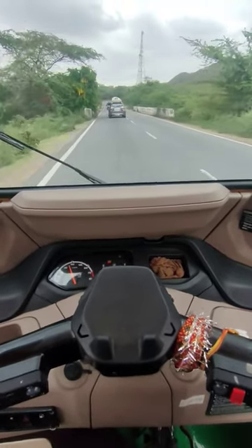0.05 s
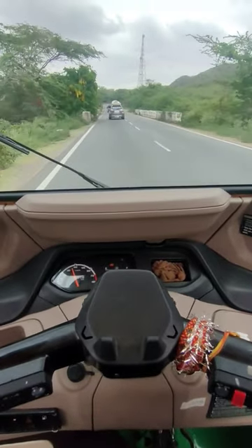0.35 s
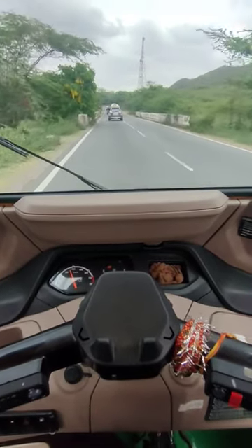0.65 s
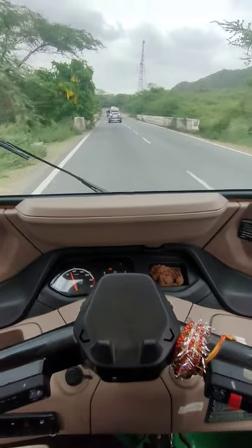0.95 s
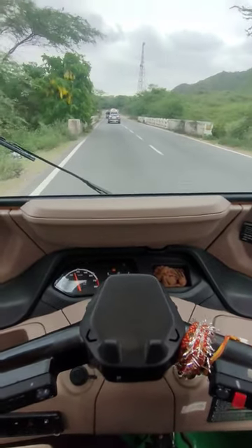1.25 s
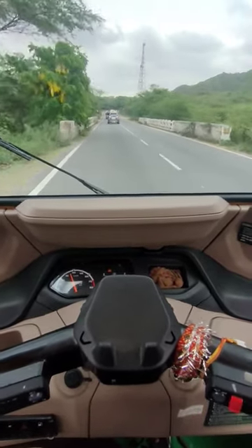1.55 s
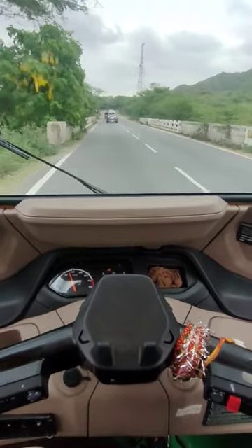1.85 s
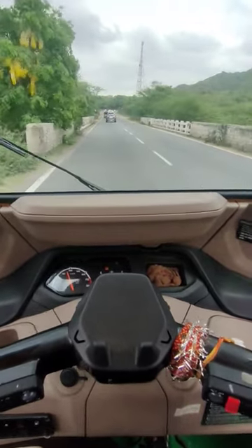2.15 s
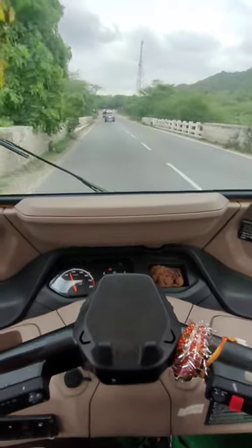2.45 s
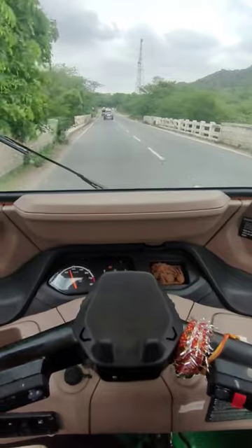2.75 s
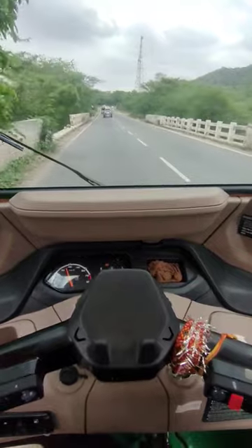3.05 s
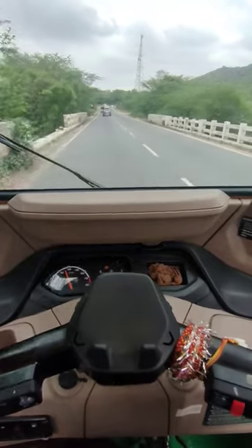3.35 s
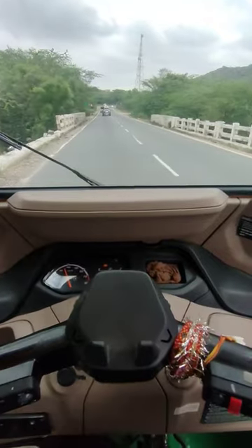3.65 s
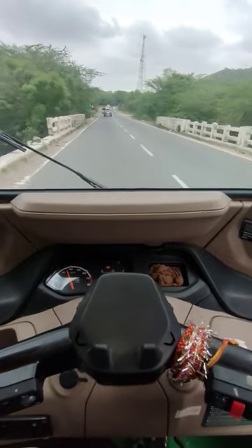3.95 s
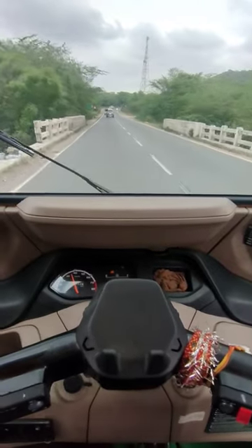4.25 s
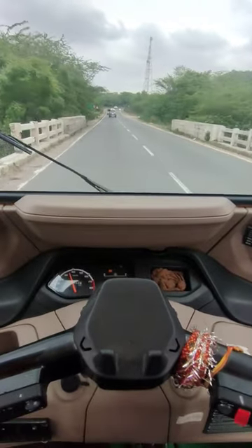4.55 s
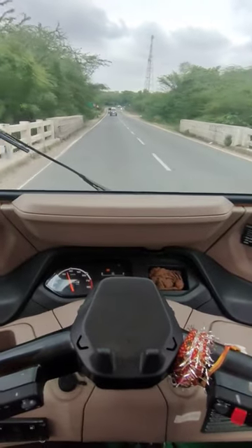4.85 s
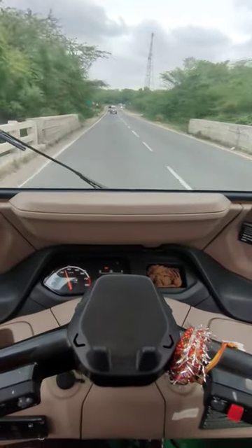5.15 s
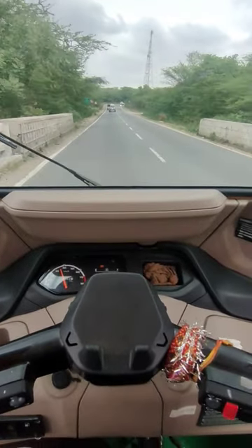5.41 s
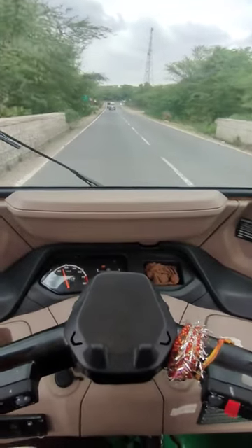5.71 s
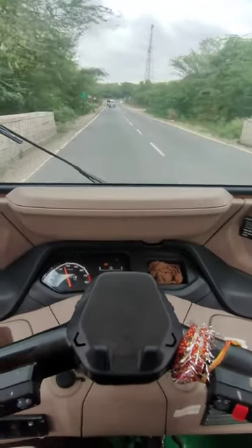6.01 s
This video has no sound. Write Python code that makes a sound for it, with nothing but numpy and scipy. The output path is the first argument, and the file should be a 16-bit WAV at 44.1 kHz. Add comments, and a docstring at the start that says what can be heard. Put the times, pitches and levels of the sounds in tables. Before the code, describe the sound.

An auto rickshaw cruises along a road, heard from the driver's seat in the open cab. Its small single-cylinder engine holds a low, throbbing hum with fast mechanical clatter, over tyre rumble and buffeting air. Hissing gusts and soft bumps come mostly in the first half. A loose metal fitting clinks about midway, and the engine then turns slightly harsher and buzzier at the same pitch.

```python
"""Open cab of an auto rickshaw, driver's seat, cruising on a country road. The single cylinder throbs once a
crank turn, sets the casing clattering and a panel buzzing; drive line and gears hum beside it. Tyres rumble,
bumps thud through the body, a low buffeting rumbles, air hisses round the windscreen, and a loose fitting
rattles now and then."""
import sys
import numpy as np
from scipy import signal
from scipy.fft import rfft, irfft, next_fast_len
from scipy.io import wavfile
from scipy.ndimage import uniform_filter1d, minimum_filter1d

SR = 44100
rng = np.random.default_rng(int(sys.argv[2]) if len(sys.argv) > 2 else 0)


def persist_wave(psi):
    """Save psi, clipped to +-1, as 16-bit WAV."""
    counts = np.round(np.clip(psi, -1, 1) * 32767).astype(np.int16)
    wavfile.write(sys.argv[1], SR, np.atleast_2d(counts).T)


N = 272361
TIME = np.arange(N) / SR
OPPOSED = np.array([[1], [-1]])  # left plus, right minus

# Crank speed. Each row: time in seconds, turn rate in Hz.
CRANK_SPEED = [(0, 51.11), (.9, 51.17), (1.4, 51.63), (2.3, 51.18), (3.6, 51.43), (4.02, 51.35),
               (4.5, 51.23), (4.7, 50.89), (5.6, 50.91), (6.18, 51.29)]
# Pull on the engine. Each row: time in seconds, load in dB.
ENGINE_LOAD = [(0, -3), (1, -2), (2.2, -2.5), (2.75, 0), (3.4, 1.5), (3.75, 1), (4.25, 0.5), (4.6, 1.5),
               (5.3, 1.5), (5.8, 0.5), (6.18, 1)]
# Cylinder hum. Each row: crank multiple, relative level in dB, left minus right in dB.
CYLINDER_ORDERS = [(1, 0, 1.1), (2, -1.1, 0.7), (3, -7, 5), (4, -11.5, 1), (5, -17.5, 5), (6, -19.5, -4.5),
                   (7, -25.5, -2), (8, -21, -3.5), (9, -24, -7.5), (10, -27, -5), (11, -21.5, 1),
                   (13, -28, -6), (14, -27.5, -9), (15, -32, 6), (17, -26, 2), (18, -34, -5), (20, -24, -7),
                   (21, -33, -4)]
# Brief level dips. Each row: centre in seconds, length in seconds, clatter dip in dB, hum dip in dB.
LEVEL_DIPS = [(0.325, 0.13, 2.5, 6), (0.853, 0.067, 1, 2.5), (1.146, 0.069, 3, 1), (1.68, 0.22, 0.5, 2.5),
              (2.078, 0.12, 0, 5), (3.17, 0.11, 3.5, 1), (4.048, 0.094, 2.5, 3), (4.381, 0.21, 4.5, 3),
              (5.906, 0.11, 5.5, 0)]
# Buzzing panel. Each row: frequency in Hz, bandwidth in Hz, level in dB at 0 dB load.
PANEL_MODES = [(1850, 100, -43.5), (2000, 38, -47.5), (2210, 130, -47.5)]
# Drive line and gear tooth tones. Each row: crank multiple, relative level in dB.
DRIVE_TONES = [(0.549, -28.5), (1.73, -32), (2.54, -34), (3.43, -38.5), (4.567, -32.5)]
GEAR_TONES = [(16.12, -31.5), (32.24, -39), (33.8, -38), (35.9, -35), (44.1, -41.5), (48.4, -40)]
# Road roughness. Each row: time in seconds, tyre rumble in dB.
ROAD_ROUGHNESS = [(0, -22.5), (.5, -18), (1.2, -20.5), (2.4, -19), (3.3, -21.5), (5, -21), (6.18, -21)]
# Thuds, knocks and rattles. Each row: start in seconds, level in dB, decay time in seconds.
BODY_THUDS = [(.235, -20.5, 0.046), (.445, -19, 0.045), (.73, -19.5, 0.08), (2.155, -18, 0.049),
              (2.42, -21, 0.093), (4.17, -23, 0.067), (5.83, -18.5, 0.047), (6.10, -22, 0.088)]
PANEL_KNOCKS = [(.034, -14, 0.0033), (.521, -27, 0.0087), (.895, -32, .03), (1.508, -27, 0.021),
                (1.715, -18, 0.01), (2.479, -23, 0.022), (4.023, -15, 0.004), (4.209, -22, 0.013)]
FITTING_SHAKES = [(1.095, -33, 0.0093), (3.075, -27, 0.007), (3.082, -31, .005)]
# The fitting strikes the frame. Each row: start in seconds, level in dB.
FITTING_STRIKES = [(3.078, -21), (3.086, -34)]
# Its ring. Each row: frequency in Hz, relative level in dB, T60 in seconds.
FITTING_MODES = [(2050, 3, 0.07), (2100, -5, .06), (3420, -8, .05), (4400, -21, .07), (5076, -21, .06),
                 (6331, -20, .07)]
# Windscreen gusts. Each row: crest in seconds, hiss in dB, clatter in dB, rise and fall in seconds.
WIND_GUSTS = [(.15, -42, -28, 0.05, .07), (.68, -30, -23.5, 0.058, 0.093), (.93, -30, -25, 0.045, 0.059),
              (1.1, -29, -28, 0.08, 0.012), (1.28, -31.5, -27, 0.13, 0.066),
              (1.53, -33.5, -27.5, 0.14, 0.066), (1.92, -34.5, -26.5, 0.091, 0.066),
              (2.46, -39.5, -28, 0.11, 0.049), (3.32, -37, -35, 0.068, 0.033),
              (4.35, -36, -27, 0.032, 0.023), (4.497, -34.5, -37, .009, 0.073)]
# Noise spectra. Each row: frequency in Hz, relative spectral density in dB.
CASING_SPECTRUM = [(300, -59), (600, 4), (850, 3), (1400, -1), (1620, -3), (1850, -4.5), (2100, -7),
                   (2400, -8.5), (2900, -16), (4200, -31.5), (8000, -34.5)]
TYRE_SPECTRUM = [(25, -1), (65, 1), (120, -2.5), (230, -4.5), (340, -9), (460, -11.5), (550, -14.5),
                 (900, -20), (1900, -27), (3200, -36), (4300, -45), (15000, -60)]
THUD_SPECTRUM = [(110, 6.5), (220, 1.5), (320, -6), (550, -6), (900, -17), (2000, -62), (6000, -48)]
KNOCK_SPECTRUM = [(250, 10), (500, 11.5), (950, -4.5), (1500, -3), (2500, -22), (5000, -55), (12000, -59)]
RATTLE_SPECTRUM = [(400, -6), (1200, 16), (1800, 2), (2100, 9), (2600, -4), (4500, 3.5), (8000, -0.5),
                   (15000, -9)]
HISS_SPECTRUM = [(1500, -2), (3000, 13.5), (4500, 4), (6000, 3.5), (7400, 5.5), (9000, -2), (13000, -3),
                 (15000, -12.5)]
GUST_SPECTRUM = [(520, 29), (900, 10), (1800, 15), (3000, 14.5), (4500, 8), (6000, 7.5), (7400, 8),
                 (9000, 3), (13000, 3), (15000, -3)]
BUFFET_SPECTRUM = [(8, 0), (28, 0), (65, -6), (120, -10), (250, -18), (1000, -45), (8000, -80)]


def engine(turns, load_db, gust_clatter, dip_db, hum_dip_db):
    """Hum and clatter follow the load; uneven combustion wavers the hum, gusts add clatter."""
    firing_db = 0.86 * walk(34) - hum_dip_db
    throb_db = -15.6 + 0.27 * load_db + firing_db
    boom_db = -16.44 + 0.4 * load_db + firing_db
    upper_db = -17 + load_db - 0.5 * dip_db
    knock_gain = undb(-27.5 + 2 * load_db - dip_db - 0.17 * walk(29))
    hum = cylinder_hum(turns, throb_db, boom_db, upper_db)
    return hum + np.hypot(knock_gain, gust_clatter) * casing_clatter(turns, load_db)


def cylinder_hum(turns, throb_db, boom_db, upper_db):
    """Low orders form a deep and a shallow pressure dip each turn; panel echoes scatter the rest."""
    out, roughness = 0, walk(42)
    for order, db, balance_db in CYLINDER_ORDERS:
        order = round(order)
        phase = 2 * np.pi * order * turns
        if order == 1:
            tone = -np.cos(phase + np.pi / 4) * undb(throb_db + db)
        elif order < 6:
            # cab standing waves put the odd orders ahead of the even ones
            skew_rad = 0.061 * order * OPPOSED + np.pi / 8 * order * (order % 2)
            tone = -np.cos(phase + skew_rad + 0.083 * walk(7.4)) * undb(boom_db + db + walk(41))
        else:
            scatter_rad = rng.uniform(0, 2 * np.pi) - 0.044 * order * OPPOSED
            wobble_rad = 0.18 * walk(6) + 0.0095 * order * roughness
            tone = np.cos(phase + scatter_rad + wobble_rad) * undb(upper_db + db + 1.6 * walk(8.1))
        out = out + np.sqrt(2) * tone * pan(balance_db)
    return out


def casing_clatter(turns, load_db, scatter_db=3.5, jitter_s=0.00013, decay_s=0.032):
    """Piston and valve knocks ring the casing's dense modes; a rush of gas follows each turn."""
    starts_s = np.interp(np.arange(1, int(turns[-1])), turns, TIME)
    timing, force = rng.standard_normal((len(starts_s), 2)).T
    hits = np.clip((starts_s + jitter_s * timing) * SR, 0, N - 1).astype(int)
    decay = np.exp(-TIME[:SR // 6] / decay_s)
    ring = 0
    for stride in (1, 2):  # piston every turn, valves every other
        knocks = np.zeros(N)
        knocks[hits[::stride]] = undb(scatter_db * force[::stride])
        contact = 1.14 * walk(5.1)  # the contact point wanders between two mode sets
        for share in (np.cos(contact), np.sin(contact)):
            response = white(len(decay)) * decay
            ring = ring + signal.fftconvolve([share * knocks], response, axes=1)[:, :N]
    ring = colour(ring, [(500, -25.5), (1300, -11.5)]) * undb(0.5 * load_db)
    gas = white() * (1 + 0.041 * np.sin(2 * np.pi * turns)) * undb(0.68 * walk(95))
    left, right = colour(unit(ring) + undb(0.5) * unit(gas), CASING_SPECTRUM)
    # a panel on the right passes more rasp
    right = colour(right, [(100, 0), (1200, 2), (2300, 4.5), (3500, 0)])
    return unit(np.array([left, right]) - 0.15 * np.array([right, left]))  # partly in antiphase


def panel_buzz(turns, load_db):
    """Each firing shakes a thin panel on the right, harder under load."""
    locked = sum(np.cos(2 * np.pi * order * turns + rng.uniform(0, 2 * np.pi, (2, 1)) + 0.64 * walk(3.3))
                 for order in range(30, 50))
    loose = unit(colour(white(), [(1500, 0), (2500, 0), (4000, -30)]))
    slap = 1 + 0.11 * np.cos(2 * np.pi * turns)
    shake = (unit(locked) + undb(-4) * loose) * undb(walk(27)) * slap
    modes = sum(undb(db) * unit(signal.lfilter(*signal.iirpeak(hz, hz / width_hz, SR), shake))
                for hz, width_hz, db in PANEL_MODES)
    return modes * undb(2 * load_db) * pan(-8)


def shaft_tones(turns, tones, waver_db, wobble_rad):
    """Shafts and gears turn at set ratios to the crank, wavering in phase and level."""
    out = 0
    for ratio, db in tones:
        phase = 2 * np.pi * ratio * turns + wobble_rad * walk(9.5)
        channel_rad = ratio / 20 * rng.standard_normal((2, 1))
        out = out + np.sqrt(2) * np.sin(phase + channel_rad) * undb(db + waver_db * walk(8.5))
    return out


def tyre_rumble(level_db, surge_db=1.5):
    """Tyre noise fills the cab, surging with the surface."""
    return undb(level_db + surge_db * walk(15)) * unit(colour(diffuse(700, 0.45), TYRE_SPECTRUM))


def road_bumps():
    """Jolts drum on the floor and now and then knock a panel."""
    thuds = bursts(BODY_THUDS, rise_s=0.00047) * unit(colour(diffuse(400, 0.94), THUD_SPECTRUM))
    knocks = bursts(PANEL_KNOCKS, rise_s=0.00053) * unit(colour(diffuse(1500, 0.61), KNOCK_SPECTRUM))
    return thuds + knocks


def loose_fitting(grain_db=2.5, contact_s=0.0015):
    """A metal fitting rattles in bursts of tiny contacts and rings when it strikes the frame."""
    contacts = white() * undb(-grain_db * walk(500))
    out = bursts(FITTING_SHAKES, rise_s=0.0019) * unit(colour(contacts, RATTLE_SPECTRUM))
    for start_s, strike_db in FITTING_STRIKES:
        age_s = np.maximum(TIME - start_s, 0)
        ring = sum(undb(db - 60 * age_s / t60_s) * np.sin(2 * np.pi * hz * age_s)
                   for hz, db, t60_s in FITTING_MODES)
        out = out + undb(strike_db) * (1 - np.exp(-age_s / contact_s)) * ring
    return out


def low_buffet(level_db=-24, swing_db=3):
    """A low buffeting rumbles, partly uncorrelated between left and right."""
    buffeting = unit(colour(diffuse(30, 0.95), BUFFET_SPECTRUM))
    return undb(level_db + swing_db * walk(1.7)) * buffeting


def windscreen_hiss(load_db, gust_hiss, dip_db, flutter_db=1.43):
    """Air hisses round the windscreen edge and tears at it in gusts."""
    steady = undb(-39.5 + 0.79 * load_db - 0.77 * dip_db) * unit(colour(white(), HISS_SPECTRUM))
    tearing = gust_hiss * unit(colour(white() * undb(walk(450)), GUST_SPECTRUM))
    return (steady + tearing) * undb(flutter_db * walk(30)) * pan(1.2)


def gust_gains():
    """Hiss and clatter gains as each gust crests and falls."""
    power = 0
    for crest_s, hiss_db, clatter_db, rise_s, fall_s in WIND_GUSTS:
        width_s = np.where(TIME < crest_s, rise_s, fall_s)
        shape = np.exp(-0.5 * ((TIME - crest_s) / width_s) ** 2)
        power = power + (undb([[hiss_db], [clatter_db]]) * shape) ** 2
    return np.sqrt(power)


def dip_depths_db(edge_s=0.0093):
    """Depth of the brief dips in clatter and in hum."""
    out = 0
    for centre_s, length_s, clatter_db, hum_db in LEVEL_DIPS:
        window = 0.5 + 0.5 * np.tanh((length_s - 2 * np.abs(TIME - centre_s)) / edge_s)
        out = out + np.array([[clatter_db], [hum_db]]) * window
    return out


def bursts(events, rise_s):
    """Envelope of fast rises and exponential decays."""
    out = 0
    for start_s, db, decay_s in events:
        age_s = np.maximum(TIME - start_s, 0)
        out = out + 2 * undb(db) * (1 - np.exp(-age_s / rise_s)) * np.exp(-age_s / decay_s)
    return out


def diffuse(corner_hz, side_share):
    """Noise from all round: long waves reach both channels more alike than short ones."""
    mid, side = white()
    short_waves = signal.sosfilt(signal.butter(1, corner_hz, "high", fs=SR, output="sos"), side)
    return mid + (side_share * side + (1 - side_share) * short_waves) * OPPOSED


def colour(x, spectrum):
    """Filter by (Hz, dB) points, rolling off below the first."""
    size = next_fast_len(N)
    hz = np.arange(1, size // 2 + 2) * SR / size
    points_hz, db = np.transpose(spectrum)
    gain = undb(np.interp(np.log(hz), np.log(points_hz), db)) * np.minimum(hz / points_hz[0], 1) ** 2
    return irfft(rfft(x, size) * gain, size)[..., :N]


def walk(bandwidth_hz, size=2 ** 14, span_s=8):
    """Smooth random drift, rms 1."""
    hz = np.arange(size // 2 + 1) / span_s
    slow = irfft(rfft(rng.standard_normal(size)) * np.exp(-(hz / bandwidth_hz) ** 2))
    return unit(np.interp(TIME, np.linspace(0, span_s, size), slow))


def white(size=N):
    """Stereo white noise."""
    return rng.standard_normal((2, size))


def curve(table):
    """Join (seconds, value) rows by straight lines."""
    return np.interp(TIME, *np.transpose(table))


def pan(balance_db):
    """Channel gains for a left minus right level."""
    return undb(OPPOSED * balance_db / 2)


def undb(db):
    """Decibels to gain."""
    return 10 ** (np.asarray(db) / 20)


def unit(x):
    """Scale to rms 1."""
    return x / np.sqrt(np.mean(x ** 2))


def scene():
    """Engine, drive line, road and air, summed in the cab."""
    turns = np.cumsum(curve(CRANK_SPEED)) / SR
    load_db = curve(ENGINE_LOAD)
    gust_hiss, gust_clatter = gust_gains()
    dip_db, hum_dip_db = dip_depths_db()
    drive = shaft_tones(turns, DRIVE_TONES, waver_db=3.5, wobble_rad=0.7)
    gears = shaft_tones(turns, GEAR_TONES, waver_db=5, wobble_rad=0.3)
    whine = gears * undb(load_db - dip_db - 16.5) * pan(-9)
    motor = engine(turns, load_db, gust_clatter, dip_db, hum_dip_db)
    buzz = panel_buzz(turns, load_db - 2.5 * dip_db)
    road = tyre_rumble(curve(ROAD_ROUGHNESS) - 0.27 * dip_db) + road_bumps()
    rattle = loose_fitting()
    air = low_buffet() + windscreen_hiss(load_db, gust_hiss, dip_db)
    return motor + buzz + drive + whine + road + rattle + air


def record(dry, ceiling=0.95, hold_s=0.0042, fade_s=0.002, cutoff_hz=15050):
    """Peak limiter, end fades, low-pass."""
    hold = int(hold_s * SR)
    max_gain = np.minimum(1, ceiling / (np.abs(dry).max(axis=0) + 1e-9))
    gain = uniform_filter1d(minimum_filter1d(max_gain, hold), hold)
    fade = np.minimum(1, np.minimum(TIME, TIME[-1] - TIME) / fade_s)
    return signal.sosfilt(signal.ellip(10, 0.1, 80, cutoff_hz, fs=SR, output="sos"), dry * gain * fade)


dry = scene()
out = record(dry)
persist_wave(out)
```